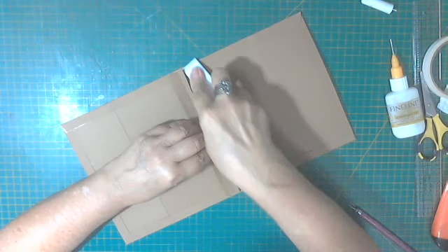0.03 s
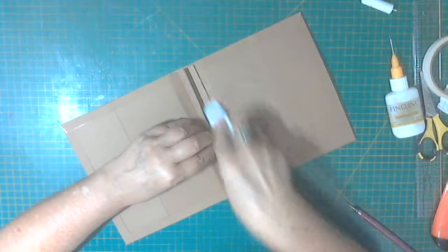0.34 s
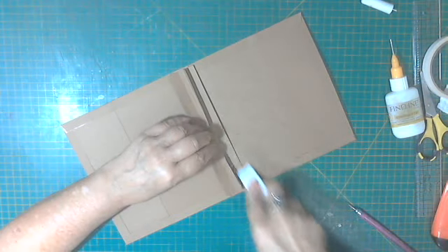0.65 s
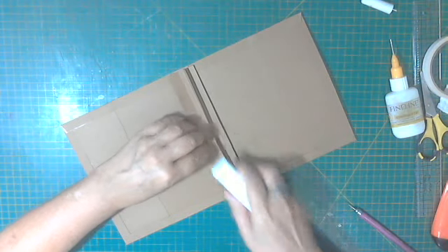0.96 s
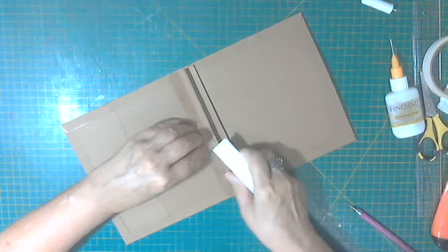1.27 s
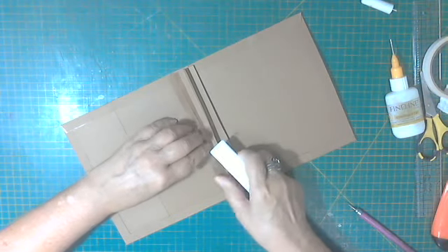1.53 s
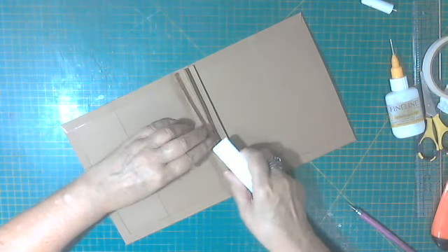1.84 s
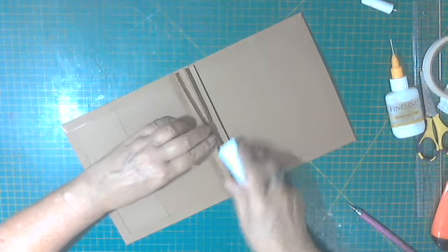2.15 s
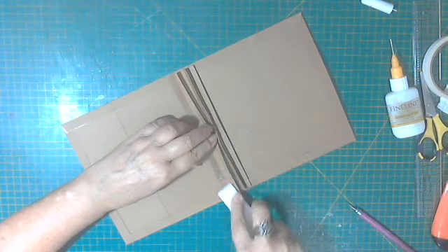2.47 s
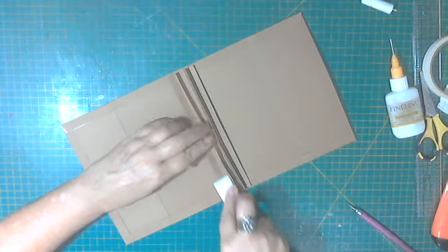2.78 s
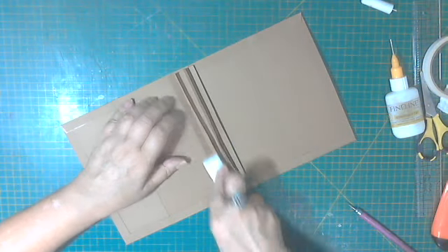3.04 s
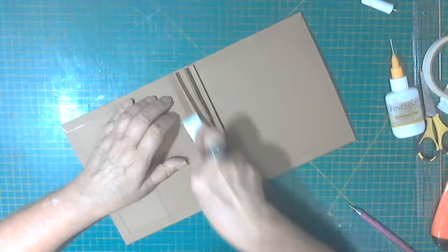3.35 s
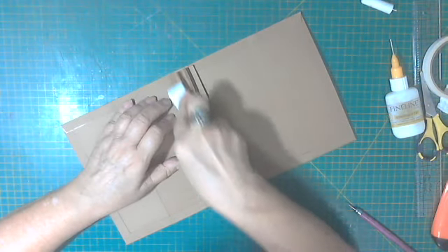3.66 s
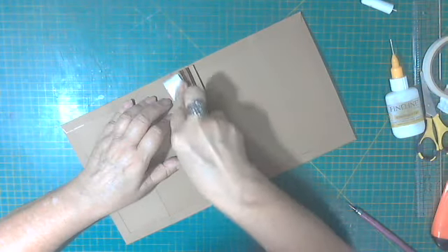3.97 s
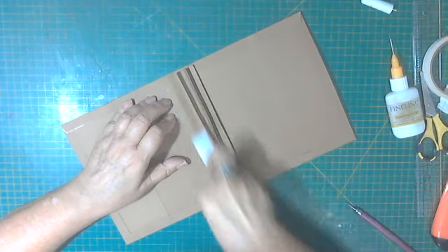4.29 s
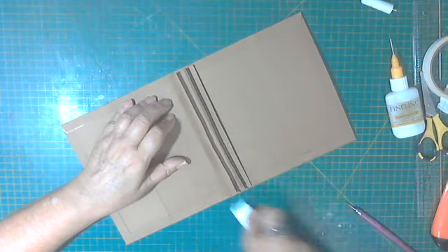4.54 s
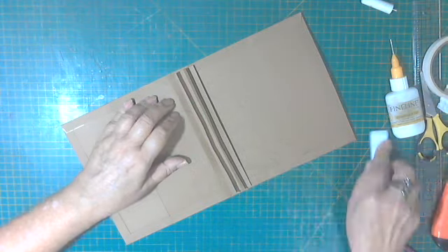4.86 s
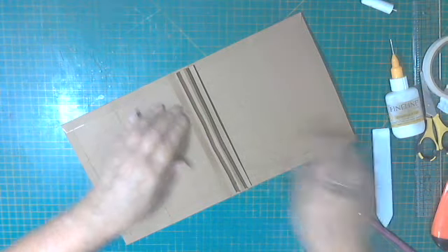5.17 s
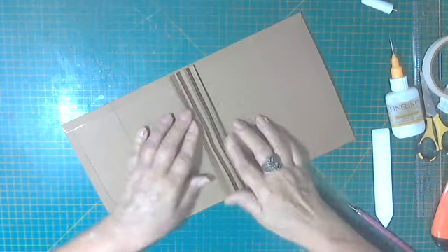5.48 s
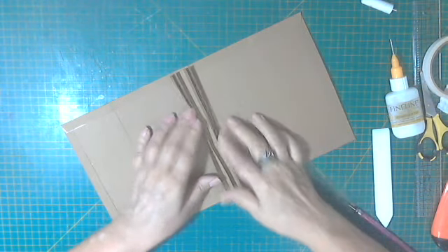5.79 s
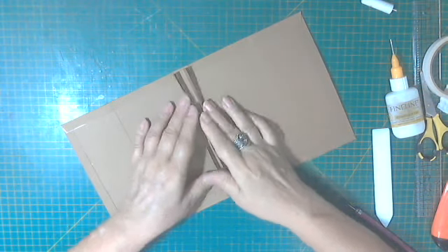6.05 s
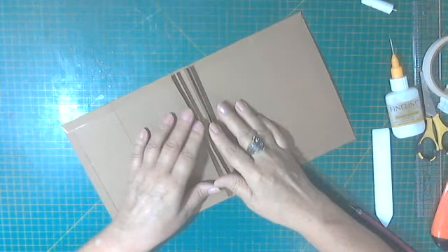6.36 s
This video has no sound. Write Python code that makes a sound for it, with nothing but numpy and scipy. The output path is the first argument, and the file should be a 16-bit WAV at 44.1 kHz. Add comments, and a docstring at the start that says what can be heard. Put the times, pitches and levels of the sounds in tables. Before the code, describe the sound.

In a small, dry room a fan hums faintly while a bone folder rubs along creases in cardboard. The first strokes are sparse and light, with crisp little snaps, then grow into longer, grainy hisses over soft bumps of hands on the table. The tool knocks the table sharply, is laid down with a short clatter, and fingers swish along the fold. Everything sounds close.

```python
"""A fan hums in a small, dry room, and a bone folder starts to hiss along the creases of a sheet of
cardboard on a cutting mat. Card fibres catch and let go, the creases snap, and the pressing hands
softly bump the table. The folder slips off the edge and knocks the table, is laid down with a
clatter, and fingers sweep along the fold."""
import sys
import numpy as np
from scipy import signal
from scipy.fft import rfft, irfft
from scipy.io import wavfile
from scipy.ndimage import uniform_filter1d

SR = 44100
rng = np.random.default_rng(int(sys.argv[2]) if len(sys.argv) > 2 else 0)


def inscribe(sig):
    """Save sig as 16-bit PCM at rate SR to the path in sys.argv[1].

    A 1-D sig is mono; a 2-D sig holds one channel per row.
    Samples are clipped to [-1, 1] before scaling.
    """
    pcm = np.round(np.clip(np.atleast_2d(sig).T, -1, 1) * 32767)
    wavfile.write(sys.argv[1], SR, pcm.astype(np.int16))


N = 283466
TIME = np.arange(N) / SR
AGE = np.arange(8192) / SR  # seconds since a hit
BINS = np.fft.rfftfreq(4096, 1 / SR)  # Hz axis for a hit's EQ


def amp(db):
    """Decibels to gain."""
    return 10 ** (np.asarray(db) / 20)


def unit(x):
    """Scales to an rms of one."""
    return x / np.sqrt(np.mean(x ** 2) + 1e-20)


def unit_hit(x):
    """Scales a hit to the energy of 5 ms at level one."""
    return x / np.sqrt(np.sum(x ** 2) / (.005 * SR))


def curve(points, hz):
    """Joins (Hz, value) points on a log-frequency axis."""
    f, value = np.transpose(points)
    return np.interp(np.log(hz + 1), np.log(f), value)


def band(hz, low_hz, high_hz, low_slope=9, high_slope=9):
    """Band-pass gain; slopes count in steps of 6 dB per octave."""
    low_cut = 1 + (low_hz / (hz + 1)) ** (2 * low_slope)
    high_cut = 1 + (hz / high_hz) ** (2 * high_slope)
    return (low_cut * high_cut) ** -.5


def add(mix, start, sound):
    """Mixes a sound in at start seconds."""
    part = mix[round(start * SR):][:len(sound)]
    part += sound[:len(part)]


def drift(hz):
    """A smooth random modulator of rms one, rolling off above hz."""
    f = np.fft.rfftfreq(N, 1 / SR)
    return unit(irfft(rfft(rng.standard_normal(N)) / (1 + (f / hz) ** 4), N))


def flurry(envelope):
    """Random contacts under an envelope, evened out so that they have no pitch of their own."""
    x = rng.standard_normal(len(AGE))
    for _ in range(4):
        spectrum = rfft(x * envelope)
        x = irfft(spectrum / (abs(spectrum) + 1e-12))  # flatten the colour
        x /= np.sqrt(abs(uniform_filter1d(x ** 2, size=64)) + 1e-20)  # flatten the level
    return x * envelope


def burst(gain, decay_s):
    """A dying flurry, coloured by a minimum-phase EQ that keeps its attack sharp."""
    log_gain = np.log(np.maximum(np.r_[gain, gain[-2:0:-1]], 1e-5))
    impulse = np.fft.ifft(np.exp(np.conj(signal.hilbert(log_gain)))).real
    return unit_hit(signal.fftconvolve(flurry(np.exp(-AGE / decay_s)), impulse)[:len(AGE)])


# Colour of the fan's air: (frequency [Hz], relative level [dB])
FAN_AIR = [(15, -87.5), (25, -54), (107, -14.5), (133, -13), (164, -8.5), (215, -14), (246, -2.5),
           (359, -13), (552, -12.5), (614, -16), (1200, -18.5), (1660, -25), (2360, -26), (9050, -37.5),
           (15500, -43)]
# Hum of its motor: (frequency [Hz], level [dB])
MOTOR_TONES = [(123.8, -94), (165.5, -66.5), (188.4, -70.5), (247, -80), (290.7, -74.5), (543.7, -78),
               (823.6, -83)]
def fan(air_db=-63.5, swell_db=1.0, waver_db=3.0):
    """The bed: rushing air with a few wavering motor tones."""
    colour = amp(curve(FAN_AIR, np.fft.rfftfreq(N, 1 / SR)))
    air = unit(irfft(rfft(rng.standard_normal(N)) * colour, N))
    hum = np.zeros(N)
    for hz, db in MOTOR_TONES:
        peak = np.sqrt(2) * amp(db + waver_db * drift(2.1))
        hum += peak * np.sin(2 * np.pi * hz * TIME + drift(3.5))
    return air * amp(air_db + swell_db * drift(10)) + hum


# Decay of the room, before the tail is gated: (frequency [Hz], t60 [s])
ROOM_DECAY = [(150, 0.3), (500, 0.1), (1500, 0.21), (4000, 0.21), (7000, 0.2), (12000, 0.18)]
def room(x, near_db, tail_db, near_decay_s=0.0033, gate_s=0.075):
    """Adds quick bright reflections from things on the desk, then a short tail that ends abruptly."""
    near = flurry(np.exp(-AGE / near_decay_s) * (AGE > .0015))
    near = signal.lfilter(*signal.butter(2, 900, "high", fs=SR), near)
    gate = np.exp(-(AGE / gate_s) ** 4) * (AGE > .005)
    hz, t, frames = signal.stft(flurry(gate), SR, nperseg=256)
    fade = amp(-60 * t / curve(ROOM_DECAY, hz)[:, None])
    tail = signal.istft(frames * fade, SR, nperseg=256)[1][:len(AGE)]
    echoes = amp(near_db) * near / np.linalg.norm(near) + amp(tail_db) * tail / np.linalg.norm(tail)
    return x + signal.fftconvolve(x, echoes)[:N]


# Soft bumps of the hands on the table: (time [s], level [dB])
HAND_BUMPS = [(0.279, -54.5), (0.54, -54), (2.463, -54), (2.839, -52), (3.246, -48), (3.385, -52.5),
              (3.938, -50.5), (4.052, -49.5), (4.087, -48), (4.384, -47), (4.757, -52.5), (4.898, -47),
              (5.33, -50)]
def hand_bumps(pitch_hz=268, decay_s=0.006):
    """Each push of the hands swells and dies in a low mode of the table."""
    out = np.zeros(N)
    swell = (AGE / decay_s / 2) ** 2 * np.exp(2 - AGE / decay_s)
    for time, db in HAND_BUMPS:
        tone = np.sin(2 * np.pi * (pitch_hz * rng.normal(1, 0.061) * AGE + rng.random()))
        add(out, time - .005, amp(db) * tone * swell)
    return out


# Modes of the table and mat: (frequency [Hz], relative level [dB], t60 [s])
TABLE_MODES = [(266, -1, 0.17), (347, -2.5, 0.13), (419.4, 7.5, 0.098), (497, -1.5, .13), (552, -3.5, 0.11),
               (828, 3.5, 0.083), (998, -8, 0.072), (1148, -9.5, 0.11), (1226, -9, .1), (1800, -7.5, 0.061),
               (2590, -2, 0.066), (3100, -4.5, 0.044)]
def table_ring(centre_hz, attack_s=.0015):
    """The table rings briefly; each blow lands on another spot and weighs the modes differently."""
    ring = np.zeros(len(AGE))
    for hz, db, t60 in TABLE_MODES:
        envelope = amp(db + rng.standard_normal() - 60 * AGE / t60)
        weight = band(hz, 0.76 * centre_hz, 3.1 * centre_hz, low_slope=9.1, high_slope=2.2)
        cycles = hz * rng.normal(1, 0.014) * AGE + rng.random()
        ring += envelope * weight * np.sin(2 * np.pi * cycles)
    return unit_hit(ring * (1 - np.exp(-AGE / attack_s)))


# Colour of a knock's crack: (frequency [Hz], relative level [dB])
CRACK_EQ = [(25, -58), (55, -28.5), (90, -10.5), (200, -20.5), (400, -4), (900, -2), (1300, -3),
            (2600, 2.5), (3700, -0.5), (5500, 5.5), (7000, 1), (9000, -9), (12000, -16.5), (15000, -20.5)]
# The folder hits the table: (time [s], crack [dB], ring [dB], push [dB], high cut [Hz], thud centre [Hz])
FOLDER_KNOCKS = [(4.579, -42.5, -45, -58.5, 7070, 450), (4.588, -20, -22, -27, 8430, 399),
                 (5.006, -39, -36.5, -65, 6750, 420), (5.0734, -33.5, -28.5, -56, 6060, 515),
                 (5.1088, -22, -29, -57, 7740, 550), (5.1204, -28, -27, -56, 8500, 550),
                 (5.1425, -33, -33, -56.5, 8400, 670), (5.1640, -44, -36.5, -56.5, 7090, 663),
                 (5.2151, -18, -23.5, -39, 9870, 405)]
def folder_knocks(crack_decay_s=0.0021, low_decay_s=0.012, thud_under_ring_db=4.0):
    """Bone on the table, in four layers: a hard crack, the mat's dead thud, a low push and a ring."""
    out = np.zeros(N)
    push_eq = band(BINS, 175, 290, low_slope=4.3, high_slope=6.5)
    for time, crack_db, ring_db, push_db, high_hz, centre_hz in FOLDER_KNOCKS:
        high_cut = band(BINS, 0, high_hz, high_slope=7.1)
        thud_eq = high_cut * band(BINS, 0.65 * centre_hz, 1.5 * centre_hz, low_slope=4.5, high_slope=2)
        # hard blows fill the mids of the crack; light ones leave it hollow
        mids_db = np.interp(ring_db, [-30, -21], [-6, 4]) / (1 + ((BINS - 1700) / 750) ** 2)
        crack_eq = amp(curve(CRACK_EQ, BINS) + mids_db) * high_cut
        add(out, time, amp(crack_db) * burst(crack_eq, crack_decay_s))
        add(out, time, amp(ring_db - thud_under_ring_db) * burst(thud_eq, low_decay_s))
        add(out, time, amp(push_db) * burst(push_eq, low_decay_s))
        add(out, time, amp(ring_db) * table_ring(centre_hz))
    return out


# Colour of snapping card: (frequency [Hz], relative level [dB])
SNAP_EQ = [(1500, -14), (2300, -5.5), (3400, -6), (4800, -0.5), (5500, 0), (6050, 5.5), (6600, 0.5),
           (7500, -2.5), (9000, -8.5), (11000, -9), (14000, -30)]
# Short snaps of the card, and two brief scuffs just before knocks:
# (time [s], level [dB], low cut [Hz], decay [s])
SNAPS_AND_SCUFFS = [(0.306, -52.5, 5000, 0.003), (0.72, -61.5, 5540, .0065), (1.2206, -52, 3200, 0.0013),
                    (1.4291, -41.5, 2600, 0.0048), (1.4336, -32, 3200, 0.00069),
                    (1.9954, -22, 1512, 0.0021), (2.045, -31, 2730, 0.0029), (2.0868, -48.5, 3440, .0013),
                    (2.7223, -51.5, 3230, .004), (3.0778, -49, 4700, 0.0017), (3.2273, -37, 2800, 0.0075),
                    (3.376, -42.5, 4570, 0.0083), (3.7214, -49.5, 4370, 0.0018), (4.1211, -36, 4050, .0016),
                    (4.2258, -36, 3730, 0.00093), (4.409, -41.5, 2980, 0.0049), (4.502, -42, 4200, 0.0023),
                    (4.996, -54.5, 2480, 0.0048), (5.104, -35, 1980, 0.011), (5.525, -33.5, 2700, 0.0039),
                    (5.829, -39, 3620, .007), (6.083, -39, 3000, 0.0023)]
def snaps_and_scuffs(high_hz=7630):
    """Short, bright bursts: the card snaps as the folder or a finger catches; two scuffs lead knocks."""
    out = np.zeros(N)
    colour = amp(curve(SNAP_EQ, BINS))
    for time, db, low_hz, decay_s in SNAPS_AND_SCUFFS:
        passband = band(BINS, low_hz, high_hz, low_slope=6.2, high_slope=8.3)
        add(out, time, amp(db) * burst(colour * passband, decay_s))
    return out


def contact(t, strokes, digs, arch_db=2, arch_oct=.3, dig_s=.015, rise_db=18.5, release_db_per_s=1207.5):
    """Each stroke takes hold, arches and lets go: level, low cut, high cut and ring pitch at times t."""
    start, length, rise, db, ramp_db, low_hz, high_hz, ring_hz = np.transpose(strokes)[:, :, None]
    progress = np.clip((t - start) / length, 0, 1)
    arch = np.sin(np.pi * progress) - 2 / np.pi  # the hand is fastest in mid-stroke
    speed_db = ramp_db * (progress - .5) + arch_db * arch
    firmness = np.interp(db, [-51, -44], [0, 1])  # only a firm stroke bends the sheet
    push_db, drop_oct = speed_db, arch_oct * firmness * arch
    for time, boost_db, octaves in digs:
        swell = np.exp(-((t - time) / dig_s) ** 2)
        push_db = push_db + boost_db * swell
        drop_oct = drop_oct + octaves * swell
    fade_in_db = rise_db * np.maximum(start - t, 0) / rise
    fade_out_db = release_db_per_s * np.maximum(t - start - length, 0)
    wander_oct = 0.052 * np.interp(t, TIME, drift(20))  # the ring wanders with the surface
    controls = np.array([db + push_db - fade_in_db - fade_out_db,
                         low_hz / 2 ** drop_oct,
                         high_hz * 2 ** (0.05 * push_db),  # more force opens the top
                         ring_hz * 2 ** (0.14 * speed_db + wander_oct)])  # sinks as the hand slows
    loudest = np.argmax(controls[0], axis=0)  # one stroke sounds at a time
    return controls[:, loudest, np.arange(len(t))]


# Colour of friction on card: (frequency [Hz], relative level [dB])
FRICTION_EQ = [(1500, -10.5), (2500, -2.5), (3300, -9), (4000, -3), (5000, -0.5), (5800, -4), (7000, 0.5),
               (8500, -6), (10000, -13.5), (11500, -20.5), (13500, -37.5)]
def friction(strokes, digs, ring_db, ring_width_hz, patchy_db, grains_per_s, grain_db, judder_db, trim_db):
    """Card fibres catch and let go by the thousand; the hiss and its ring shift with the contact."""
    sizes = amp(grain_db * np.minimum(rng.exponential(1, N), 4))
    catches = sizes * rng.standard_normal(N) * (rng.random(N) < grains_per_s / SR)
    hz, t, frames = signal.stft(unit(catches), SR, nperseg=256, noverlap=192)
    hz = hz[:, None]
    level_db, low_hz, high_hz, ring_hz = contact(t, strokes, digs)
    lightness = np.interp(level_db, [-54, -42], [1, .4])  # a light touch lets the card ring
    resonance_db = lightness * ring_db / (1 + ((hz - ring_hz) / ring_width_hz) ** 2)
    # each patch of the uneven surface has its own colour
    patches = uniform_filter1d(rng.standard_normal(frames.shape), size=4, axis=0)
    patches = unit(uniform_filter1d(patches, size=16, axis=1))
    colour = amp(curve(FRICTION_EQ, hz) + resonance_db + patchy_db * patches)
    # quiet hiss has steep band edges; loud hiss has gentler ones
    slope = np.interp(level_db, [-52, -43], [6.5, 3.3])
    # the whole sheet answers faintly under even the lightest touch
    body = amp(-20.5) * band(hz, 2190, 6280, low_slope=6, high_slope=6)
    colour *= band(hz, low_hz, high_hz, low_slope=2 * slope, high_slope=slope) ** 2 + body
    colour /= np.sqrt(np.mean(colour ** 2, axis=0))
    hiss = signal.istft(frames * colour, SR, nperseg=256, noverlap=192)[1][:N]
    return hiss * amp(np.interp(TIME, t, level_db) + trim_db + judder_db * drift(70))


# Sweeps along the fold: (time [s], length [s], rise [s], level before trim [dB], level ramp [dB],
# low cut [Hz], high cut [Hz], card ring [Hz])
FINGER_SWEEPS = [(5.25, 0.08, 0.09, -47, -3, 2330, 9400, 6200),
                 (5.325, 0.084, 0.052, -42.5, -4, 1800, 9700, 6300),
                 (5.43, 0.11, 0.11, -43, -5, 2770, 7600, 6300),
                 (5.58, 0.17, .02, -72.5, 4, 3800, 7950, 6100),
                 (5.83, 0.15, 0.01, -43.5, -1, 2710, 9150, 6400),
                 (5.96, 0.081, .03, -45, -7.5, 3360, 8900, 6500),
                 (6.062, 0.048, 0.076, -43.5, -4.5, 2750, 8950, 6400),
                 (6.196, 0.028, 0.018, -47, -2.5, 3030, 7900, 4700),
                 (6.28, 0.12, .04, -66.5, -7, 3470, 8000, 5140)]
def finger_sweeps():
    """Skin brushes the card: a smooth, fine-grained swish with a broad ring."""
    return friction(FINGER_SWEEPS, digs=[], ring_db=8.5, ring_width_hz=730, patchy_db=0.6,
                    grains_per_s=13000, grain_db=-1, judder_db=0.5, trim_db=-0.5)


# Strokes along the creases: (time [s], length [s], rise [s], level before trim [dB], level ramp [dB],
# low cut [Hz], high cut [Hz], card ring [Hz])
FOLDER_STROKES = [(0.23, 1, 0.074, -75, -1.5, 4000, 8300, 6100),
                  (0.305, 0.028, 0.018, -52.5, -2.5, 5200, 9800, 6000),
                  (1.205, 0.02, 0.011, -54.5, 5, 2630, 7700, 4930),
                  (1.382, 0.016, 0.011, -52.5, -1, 2400, 7600, 5000),
                  (1.44, 0.05, 0.06, -50.5, -2.5, 4100, 8100, 5900),
                  (1.828, 0.045, 0.039, -47, -0.5, 5300, 7600, 7300),
                  (1.974, 0.012, 0.012, -46, -0.5, 2860, 7100, 6030),
                  (2.012, 0.08, .02, -44.5, 2, 2530, 7310, 6200),
                  (2.178, 0.026, 0.022, -47, -2.5, 4800, 8400, 5900),
                  (2.509, 0.0081, 0.0047, -49.5, -3.5, 3200, 9800, 5680),
                  (2.727, 0.02, 0.01, -47, 4, 3200, 10560, 4650),
                  (2.75, 0.13, .02, -55.5, 2, 4600, 6900, 5800),
                  (2.865, 0.12, 0.022, -53.5, -1, 4500, 7740, 6200),
                  (3.1, 0.19, 0.068, -48, -0.5, 4780, 8000, 5750),
                  (3.31, 0.3, 0.027, -52, -2, 4450, 7200, 5740),
                  (3.635, 0.045, 0.022, -50.5, -3.5, 4600, 7700, 5000),
                  (3.69, 0.089, .02, -55.5, -1, 4540, 5600, 5160),
                  (4.1, 0.24, 0.035, -43, 2.5, 3470, 9000, 5560),
                  (4.33, 0.22, 0.05, -49, -3, 4370, 8000, 6800)]
# The tip digs into the crease: (time [s], boost [dB], drop of the low cut [octaves])
TIP_DIGS = [(2.829, 4, 0.83), (2.965, 1, 0.22), (3.25, 2, 1), (3.39, 5, 0.25), (3.5, 4, 0.05),
            (3.644, 3, 0.27), (3.772, 6.5, 0.14), (4.17, 3, .35), (4.208, 3.5, 0.24), (4.257, 0, .55),
            (4.355, 9.5, 0.56), (4.426, 6.5, 0.7), (4.505, 6.5, .05), (4.545, 3, 0.1)]
def folder_strokes():
    """Bone rubs the card: a grainy, juddering hiss that swells and reaches lower as the tip digs in."""
    return friction(FOLDER_STROKES, TIP_DIGS, ring_db=10.5, ring_width_hz=370, patchy_db=3,
                    grains_per_s=7000, grain_db=0, judder_db=1.5, trim_db=-3)


def scene():
    """Rubbing, snaps, scuffs and knocks in the room, over dry hand bumps and the fan, in mono."""
    rubbing = room(folder_strokes() + finger_sweeps(), near_db=-12.5, tail_db=-17)
    snapping = room(snaps_and_scuffs(), near_db=-7, tail_db=-11)
    knocking = room(folder_knocks(), near_db=-6.5, tail_db=-8.5)
    return (rubbing + snapping + knocking + hand_bumps() + fan())[None]


def record(dry):
    """A steep high cut at 15.8 kHz on the whole mix."""
    high_cut = signal.firwin(511, 15800, window=("kaiser", 9), fs=SR)
    return signal.oaconvolve(dry, high_cut[None], "same")


dry = scene()
out = record(dry)
inscribe(out)
```